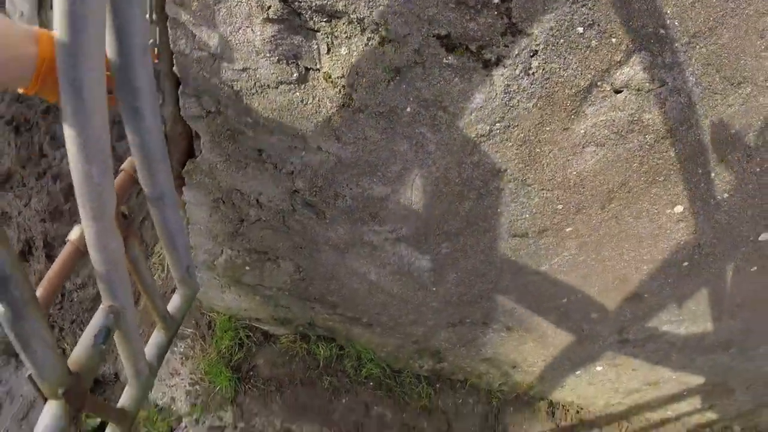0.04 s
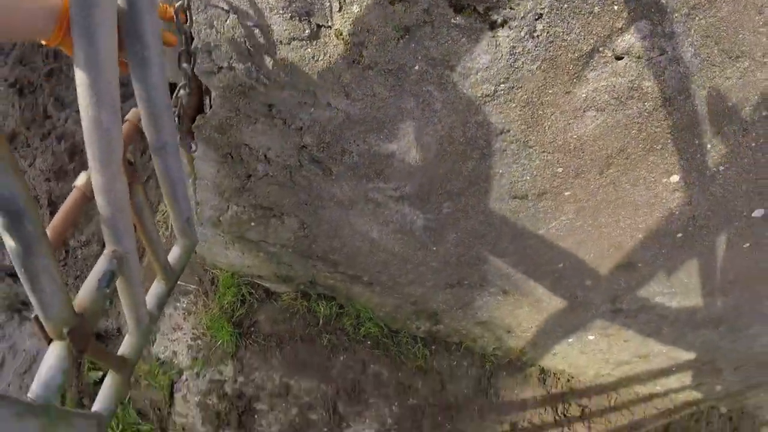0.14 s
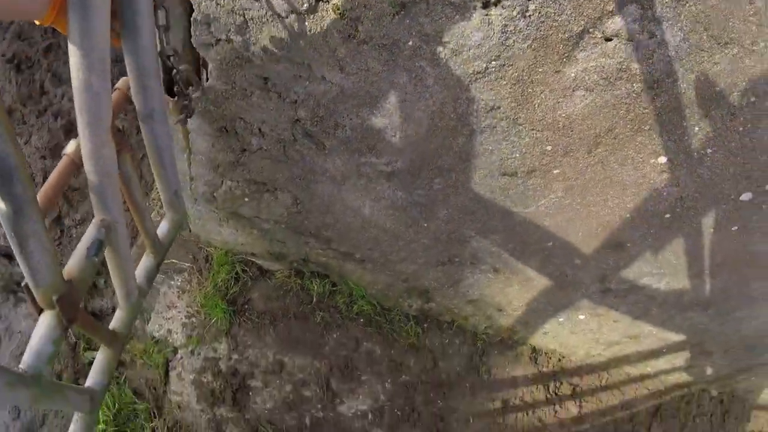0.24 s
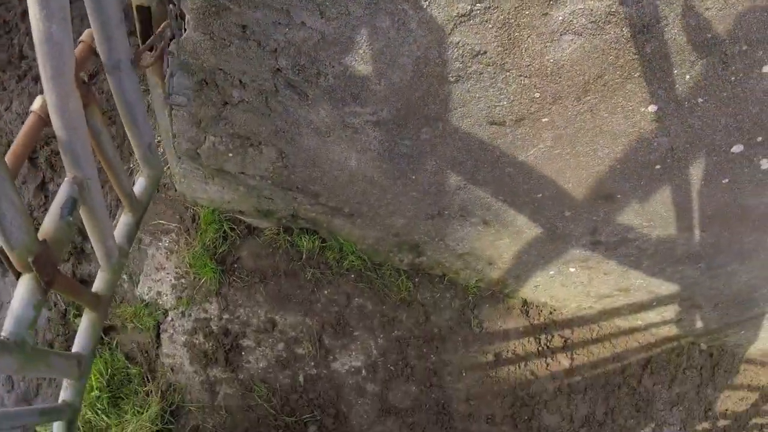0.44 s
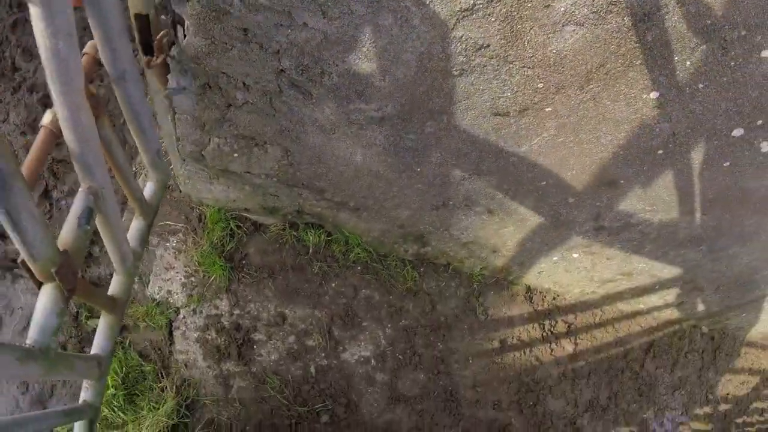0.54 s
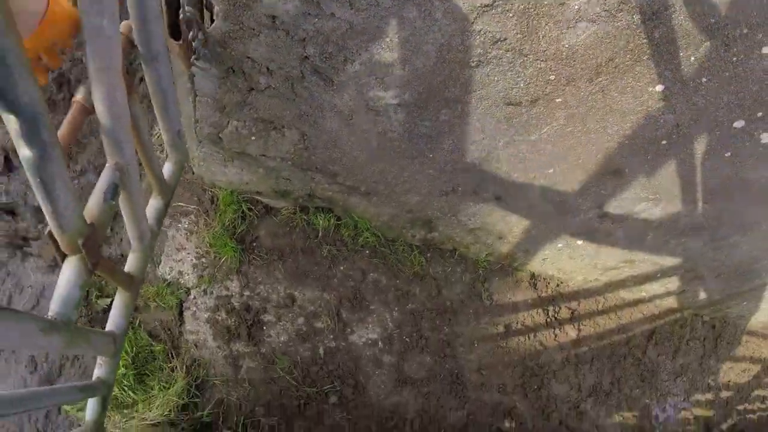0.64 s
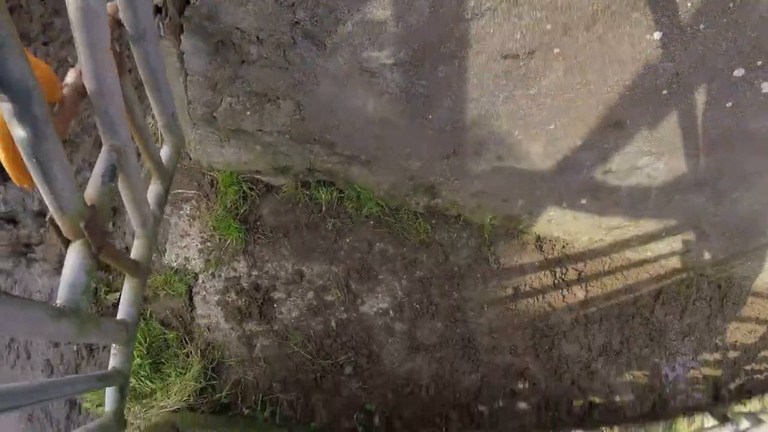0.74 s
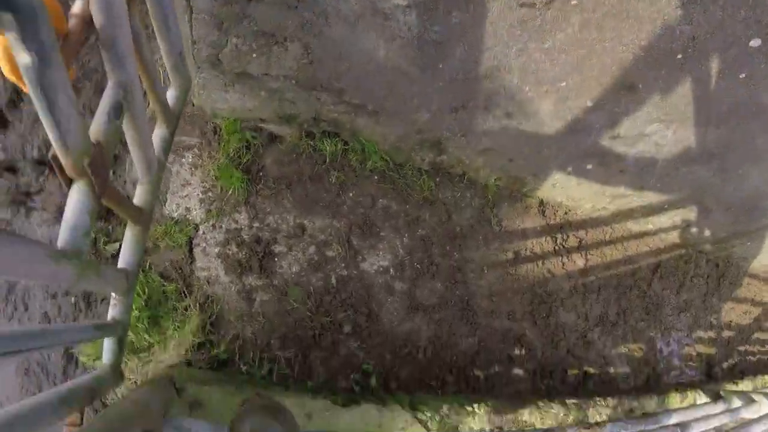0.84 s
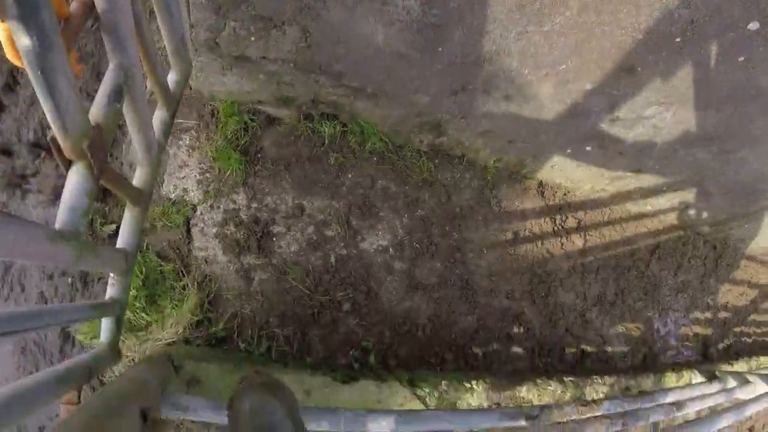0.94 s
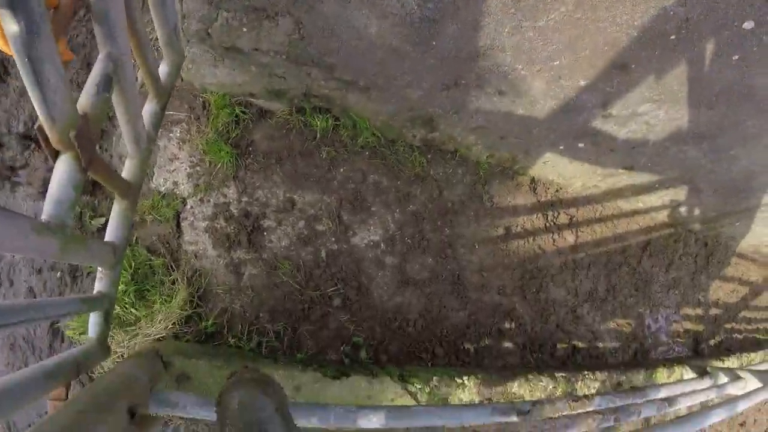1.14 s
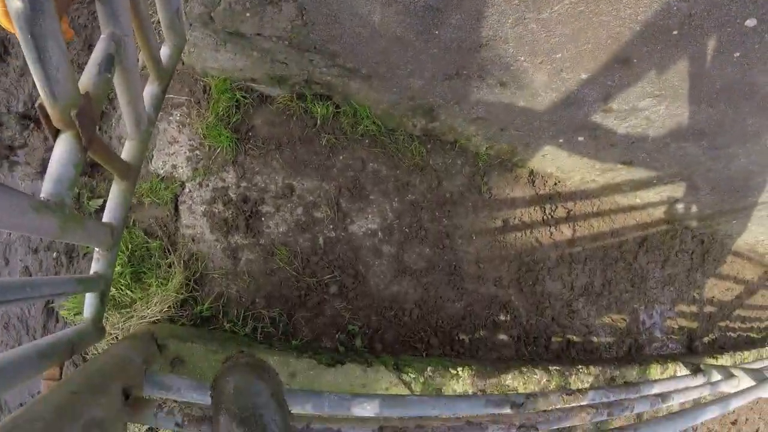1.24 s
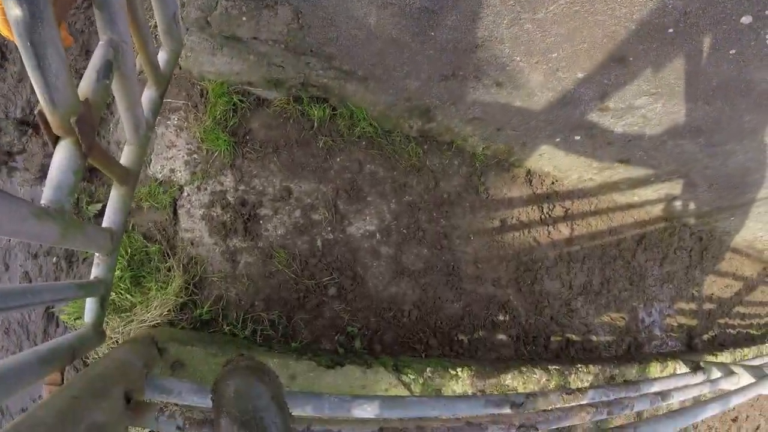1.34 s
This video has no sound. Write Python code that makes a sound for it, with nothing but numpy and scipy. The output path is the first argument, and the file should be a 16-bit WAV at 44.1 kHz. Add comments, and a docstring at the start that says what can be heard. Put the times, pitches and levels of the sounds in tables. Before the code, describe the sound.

Thin, high chain links jingle and clang on hollow steel gate bars, with soft handling bumps

```python
"""A loose chain clinks high and thin as it is handled against a tubular steel farm gate, outdoors.
Each clink is a noise tick, a short jingle of many links and the ringing tones of three free links.
The chain clangs on bars and the gate frame knocks: bursts of clatter with ringing tones.
Underneath, shaped noise makes soft scuffs, handling rumble, light wind and still air."""
import sys
import numpy as np
from scipy import signal
from scipy.fft import rfft, irfft
from scipy.io import wavfile

SR = 44100
rng = np.random.default_rng(int(sys.argv[2]) if len(sys.argv) > 2 else 0)


def store_pcm(level_fs):
    """Save levels as 16-bit WAV."""
    pcm = np.round(np.clip(level_fs, -1, 1) * 32767).astype(np.int16)
    wavfile.write(sys.argv[1], SR, np.atleast_2d(pcm).T)


N = 61739  # length in samples, about 1.4 s

# Tone colour of still air, of handling rumble and of wind: f/Hz, relative level/dB
AIR_COLOUR = [(100, 4.5), (300, 2.5), (600, -5.5), (1500, -17), (4000, -27), (9000, -16.5), (15000, -28)]
HANDLING_COLOUR = [(100, -29.5), (160, 3.5), (280, -4.5), (420, -5), (650, -12.5), (1100, -8.5),
                   (2000, -14), (5000, -21), (9000, -24.5), (15000, -58)]
WIND_COLOUR = [(15, -9.5), (45, 3.5), (75, -6.5), (120, -14.5), (250, -16), (600, -57)]
# Loudness of the rumble and of the wind over time: t/s, level/dB
HANDLING_LEVEL = [(0, -46), (.3, -44.5), (.5, -41.5), (.65, -42.5), (.85, -42), (1.0, -47), (1.1, -49.5),
                  (1.2, -54.5), (1.3, -54.5), (1.4, -56)]
WIND_LEVEL = [(0, -57), (.5, -57.5), (.76, -51), (.82, -46.5), (1.001, -47), (1.2, -45), (1.4, -40)]
AIR_DB = -58.5

# Soft scuffs and bumps: t/s, level/dB before fading, centre f/Hz, rise time constant/s, t60/s
SCUFFS = [(0.812, -26.5, 784, 0.00059, 0.034), (0.8825, -26, 744, 0.00037, 0.015),
          (0.889, -30, 384, 0.00058, 0.04), (0.913, -34, 456, 0.0059, 0.18),
          (0.97, -28.5, 180, 0.0048, 0.071), (1.01, -33, 155, 0.0094, 0.27),
          (1.135, -32.5, 255, 0.0035, 0.17)]
SCUFF_OCTAVES = 0.49  # spread of each scuff around its centre

# Centres of the five clatter bands: f/Hz
BAND_HZ = [300, 1300, 2600, 5200, 10000]
# Tone colour of steel clatter, also used for the link ticks: f/Hz, relative level/dB
CLATTER_COLOUR = [(100, -28), (260, -4.5), (650, -7), (1100, -2.5), (1900, 4.5), (3000, 3), (3600, -0.5),
                  (4500, -1.5), (5500, 5.5), (6600, -6), (8500, -6.5), (12000, -10.5), (15000, -36)]
# Blows on the steel: t/s, part struck, ring level/dB, ring tilt/dB per octave, favoured f/Hz,
# ring-time factor, clatter t60/s in the middle band, then the clatter level/dB in each of the five bands
BLOWS = [(0.0, "frame", -42, 1.5, 5050, 0.72, .12, -49, -43, -42, -43, -57),
         (0.006, "frame", -40.5, 2, 3120, 0.9, 0.11, -62, -48, -32, -39, -49),
         (0.069, "frame", -50.5, -2.5, 1670, 1, 0.2, -45, -47, -55, -60, -65),
         (0.155, "frame", -44, -1, 1800, 1.2, 0.13, -45, -45, -43, -50, -67),
         (0.164, "frame", -43, -0.5, 1780, 1, 0.11, -45, -37.5, -39, -41, -46),
         (0.23, "bright bar", -31, -5, 1108, 1.07, 0.12, -45.5, -30, -22.5, -18, -28),
         (0.2344, "bright bar", -16, 1.5, 4170, 1.23, 0.3, -58, -39, -39, -21.5, -40),
         (0.2625, "bright bar", -23.5, 2, 4080, 0.64, 0.23, -56, -41, -38.5, -27, -51),
         (0.311, "dull bar", -36, 3.5, 4800, 0.85, 0.13, -60, -50, -46, -38, -52),
         (0.3491, "bright bar", -60, 6, 5300, 0.39, 0.044, -66, -43, -41, -26, -33.5),
         (0.475, "dull bar", -38, 4, 5500, 0.68, 0.12, -58, -41, -35, -33, -46),
         (0.4823, "dull bar", -25, -1, 3900, 0.93, 0.21, -47, -35, -27.5, -23, -53),
         (0.648, "dull bar", -46, 2, 5240, .8, 0.082, -49, -44, -44.5, -38, -52),
         (0.6778, "dull bar", -48, -0.5, 5540, 1.08, 0.083, -68, -58, -40, -33.5, -37),
         (0.724, "frame", -30.5, -5.5, 1385, 1.1, 0.092, -42, -25.5, -25.5, -28.5, -58),
         (0.7283, "dull bar", -52, 3, 7000, .3, 0.027, -53, -45, -46, -27, -28),
         (0.7422, "frame", -28.5, -4, 2780, 0.89, 0.087, -44, -33, -24, -30.5, -39),
         (1.0041, "frame", -26, 1.5, 4510, 0.74, 0.049, -61, -32.5, -24, -21.5, -27),
         (1.1262, "frame", -31.5, -0.5, 1800, 0.86, 0.14, -35.5, -39, -33, -31.5, -46)]

# Ringing tones (modes) of the frame, of a bright bar and of a dull bar.
# One list for each column: f/Hz, relative level/dB, t60/s before the ring-time factor
FRAME_HZ = [266, 440, 1071, 1347, 1475, 1618, 1779, 1923, 1968, 2060, 2290, 2686, 2742, 2824, 3015, 3126,
            4936, 5036, 5170, 5375, 7550]
FRAME_DB = [-12.5, -20, -7.5, -10, -1.5, -6, 0, -9, -5, -10.5, -9.5, -15, -5, -5, -6, -4.5, 1, -7.5, -5.5,
            -3, -14.5]
FRAME_T60 = [0.14, 0.19, 0.16, 0.52, 0.19, .26, 0.19, 0.24, 0.21, 0.19, .17, 0.12, 0.14, .16, 0.17, 0.13,
             0.12, .17, 0.184, 0.15, 0.21]
BRIGHT_BAR_HZ = [834, 995, 1069, 1862, 2059, 2532, 3975, 4016, 4056, 4221, 4576, 4626, 4694, 4909, 5185,
                 5312, 5566, 5640, 5738, 6193, 7960]
BRIGHT_BAR_DB = [-15.5, -14, -6.5, -16.5, -13.5, -15, -14.5, -4, -9.5, -20, -11.5, -13.5, -12.5, -15, -13,
                 -9, -6.5, -11, -17, -12, -9.5]
BRIGHT_BAR_T60 = [.5, .3, .45, .4, .25, .25, .45, .4, .42, .25, .25, .25, .33, .25, .25, .2, .22, .25, .2,
                  .17, .12]
DULL_BAR_HZ = [520, 885, 1160, 1709, 1862, 1905, 2088, 2191, 2532, 2874, 3943, 4059, 4344, 4521, 4578, 4726,
               4858, 5157, 5501, 5641, 6950]
DULL_BAR_DB = [-9, -11, -10, -9.5, -11, -6.5, -4.5, -3.5, -1.5, -7.5, -3.5, -2.5, -8, 0, -2, -8.5, -4.5, -8,
               -7.5, -8, -12]
DULL_BAR_T60 = [0.1, 0.14, 0.13, 0.43, 0.34, 0.28, 0.21, 0.27, 0.19, 0.21, 0.26, 0.3, 0.12, 0.24, 0.33,
                0.38, 0.39, 0.33, 0.29, 0.32, 0.4]
PARTS = {
    "frame": (FRAME_HZ, FRAME_DB, FRAME_T60),
    "bright bar": (BRIGHT_BAR_HZ, BRIGHT_BAR_DB, BRIGHT_BAR_T60),
    "dull bar": (DULL_BAR_HZ, DULL_BAR_DB, DULL_BAR_T60),
}

# Link against link: t/s, ring-time factor, tick level/dB, crowd level/dB, level/dB of each of three free links
CLINKS = [(0.021, 0.78, -50, -41.5, -58, -58, -50), (0.0741, 0.94, -42.5, -41, -39, -52, -47),
          (0.094, .8, -65, -63, -33, -56, -58), (0.1974, 0.29, -44, -32, -27.5, -43, -34),
          (0.2137, 0.051, -28, -38, -17.5, -25, -18), (0.2304, 0.24, -29, -30, -34, -34, -28),
          (0.262, 0.19, -39, -30, -29, -36, -32), (0.3112, 0.14, -42, -38, -30, -40, -39),
          (0.35, .15, -37, -43, -41, -48, -43), (0.4058, 1, -30.5, -31, -20.5, -24.5, -20.5),
          (0.4833, 0.82, -47, -30, -22.5, -31, -38), (0.5705, 0.19, -42, -32, -27.5, -38, -37),
          (0.612, .3, -39, -44, -31, -40, -38), (0.619, 0.24, -31.5, -27.5, -27, -28, -25.5),
          (0.6494, 0.9, -37, -22.5, -37, -25.5, -33), (1.007, 0.99, -38, -39, -28, -41, -39)]
# Modes of the three free links, an inner list for each link.
# One list for each column: f/Hz, relative level/dB, t60/s before the ring-time factor
LINK_HZ = [
    [10638, 13365],
    [11222, 12778],
    [10600, 11305, 11340, 12680, 13400],
]
LINK_DB = [
    [-1, -15],
    [-2, -7],
    [-1.5, -5, -4, -9.5, -11],
]
LINK_T60 = [
    [0.42, 0.412],
    [0.34, .36],
    [0.32, 0.16, .22, .2, 0.25],
]
# Resonances shared by the crowd of other links: centre f/Hz, distance to half gain f/Hz, relative level/dB
CROWD = [(10510, 110, -1.5), (11260, 150, -1.5), (12770, 150, -8.5), (13100, 70, -13)]

HIT_S = 0.7  # longest sound of a single hit
CLATTER_RISE_S, RING_RISE_S = 0.00037, 0.0013  # time constants
CLATTER_DAMPING = 0.13  # t60 falls as frequency to this power
MODE_SPACING_HZ = 9  # mean gap between the weak modes of the clatter
SPOT_DB, SPOT_OCTAVES = 7, 0.105  # lift and spread of the favoured modes
JINGLE_T60_S = 0.15  # for a ring-time factor of 1
TICK_T60_S, TICK_CORNER_HZ = 0.035, 4540  # ticks lose their bass below the corner
TREBLE_LIMIT_HZ = 15000


def amp(db):
    """Turns decibels into gain."""
    return 10 ** (np.asarray(db) / 20)


def evened(x):
    """Scales a sound to rms 1."""
    return x / np.sqrt(np.mean(x ** 2) + 1e-20)


def colour_gain(points, hz):
    """Reads a tone colour as gain, joining its points in dB along a log-frequency axis."""
    f, db = np.transpose(points)
    return amp(np.interp(np.log(hz + 1), np.log(f + 1), db))


def add(mix, s, sound):
    """Mixes in a sound that starts at s seconds, cutting it at the end of the mix."""
    place = mix[round(s * SR):][:len(sound)]
    place += sound[:len(place)]


def noise(gain, size):
    """Makes noise of rms 1 with a given gain at each frequency."""
    return evened(irfft(rfft(rng.standard_normal(size)) * gain, size))


def dying(t, rise_s, t60):
    """Rises quickly and fades exponentially, dropping 60 dB in each t60."""
    rise = 1 - np.exp(-t / max(rise_s, 1e-5))
    return rise * np.exp(-np.log(1000) * t / max(t60, 1e-3))


def hit_axes():
    """Gives the times and frequencies used for a single hit."""
    t = np.arange(round(HIT_S * SR)) / SR
    return t, np.fft.rfftfreq(len(t), 1 / SR)


def ring(modes, t, ring_factor, tilt_db=0, spot_hz=1):
    """Rings a part's fading sine modes; the spot struck tilts them and favours those near one pitch."""
    hz, db, t60 = map(np.array, modes)
    tilt = tilt_db * np.log2(hz / np.median(hz))
    spot = SPOT_DB * np.exp(-0.5 * (np.log2(hz / spot_hz) / SPOT_OCTAVES) ** 2)
    gain = amp(db + tilt + spot)
    out = np.zeros(len(t))
    for k in range(len(hz)):
        sign = (-1) ** k  # neighbouring modes start in opposite directions
        fade = dying(t, RING_RISE_S, t60[k] * ring_factor)
        out += sign * gain[k] * fade * np.sin(2 * np.pi * hz[k] * t)
    return out


def still_air():
    """Still outdoor air: steady, coloured noise."""
    hz = np.fft.rfftfreq(N, 1 / SR)
    return amp(AIR_DB) * noise(colour_gain(AIR_COLOUR, hz), N)


def changing_noise(colour, level):
    """Coloured noise whose loudness follows a curve over time."""
    t, hz = np.arange(N) / SR, np.fft.rfftfreq(N, 1 / SR)
    loudness = amp(np.interp(t, *np.transpose(level)))
    return loudness * noise(colour_gain(colour, hz), N)


def wind():
    """Wind on the microphone: low noise that swells towards the end."""
    return changing_noise(WIND_COLOUR, WIND_LEVEL)


def handling():
    """Handling rumble: mostly low noise of changing loudness."""
    return changing_noise(HANDLING_COLOUR, HANDLING_LEVEL)


def scuffs():
    """Dull scuffs and bumps: short bands of noise that leave no ringing tone."""
    out = np.zeros(N)
    t, hz = hit_axes()
    for s, db, centre_hz, rise_s, t60 in SCUFFS:
        band = np.exp(-0.5 * (np.log2((hz + 1) / centre_hz) / SCUFF_OCTAVES) ** 2)
        add(out, s, amp(db) * noise(band, len(t)) * dying(t, rise_s, t60))
    return out


def clatter(t, t60, band_levels_db):
    """Many weak, short-lived modes of steel tubing, scattered at random; the high ones die first."""
    hz = np.fft.rfftfreq(len(t), 1 / SR)
    chosen = rng.random(len(hz)) < hz[1] / MODE_SPACING_HZ
    phases = np.exp(2j * np.pi * rng.random(len(hz)))
    body = colour_gain(CLATTER_COLOUR, hz) * chosen * phases
    out = np.zeros(len(t))
    # each row of the identity matrix picks one band, which blends into its neighbours
    for centre, db, pick in zip(BAND_HZ, band_levels_db, np.eye(len(BAND_HZ))):
        weight = np.interp(np.log(hz + 1), np.log(BAND_HZ), pick)
        band = evened(irfft(body * weight, len(t)))
        band_t60 = t60 * (BAND_HZ[2] / centre) ** CLATTER_DAMPING
        out += amp(db) * band * dying(t, CLATTER_RISE_S, band_t60)
    return out


def gate_blows():
    """Each blow on the steel is a burst of clatter with the strong modes of that part ringing."""
    out = np.zeros(N)
    t, _ = hit_axes()
    for s, part, ring_db, tilt_db, spot_hz, ring_factor, t60, *band_levels_db in BLOWS:
        tones = amp(ring_db) * ring(PARTS[part], t, ring_factor, tilt_db, spot_hz)
        add(out, s, tones + clatter(t, t60, band_levels_db))
    return out


def chain():
    """Links tick together: most jingle briefly in a crowd, three ring on, each clink with its own ring time."""
    out = np.zeros(N)
    t, hz = hit_axes()
    bass_cut = hz ** 2 / (hz ** 2 + TICK_CORNER_HZ ** 2)
    tick_gain = colour_gain(CLATTER_COLOUR, hz) * bass_cut
    crowd_gain = sum(amp(db) / (1 + ((hz - centre) / width) ** 4) for centre, width, db in CROWD)
    links = list(zip(LINK_HZ, LINK_DB, LINK_T60))
    for s, ring_factor, tick_db, crowd_db, *link_levels_db in CLINKS:
        tick = amp(tick_db) * noise(tick_gain, len(t)) * dying(t, 0, TICK_T60_S)
        crowd_fade = dying(t, RING_RISE_S, JINGLE_T60_S * np.sqrt(ring_factor))
        crowd = amp(crowd_db) * noise(crowd_gain, len(t)) * crowd_fade
        free = sum(amp(db) * ring(modes, t, ring_factor) for db, modes in zip(link_levels_db, links))
        add(out, s, tick + crowd + free)
    return out


def scene():
    """Adds the background, the gate and the chain into one channel."""
    background = still_air() + wind() + handling()
    return (background + scuffs() + gate_blows() + chain())[None]


def record(dry):
    """Removes the highest treble with a smooth low-pass filter."""
    lowpass = signal.firwin(255, TREBLE_LIMIT_HZ, window=("kaiser", 9), fs=SR)
    return signal.oaconvolve(dry, lowpass[None], "same")


dry = scene()
out = record(dry)
store_pcm(out)
```